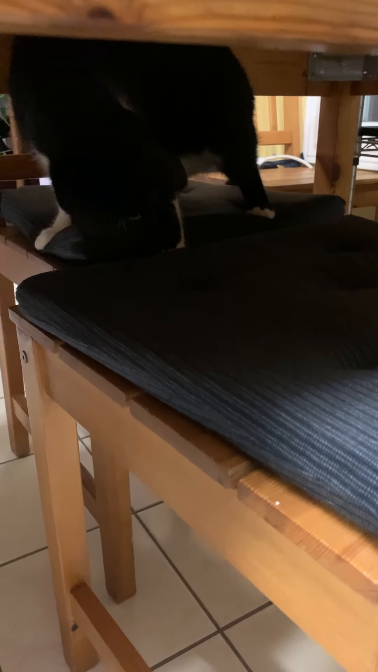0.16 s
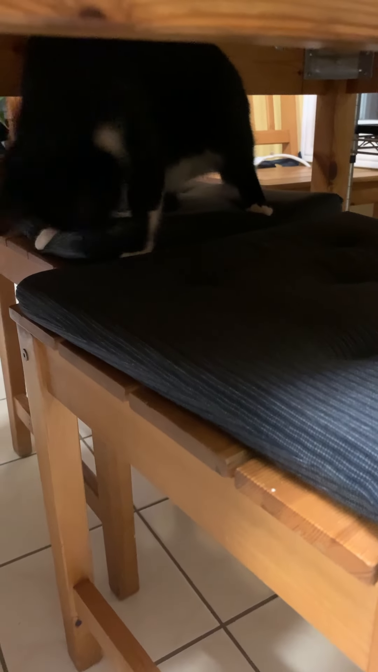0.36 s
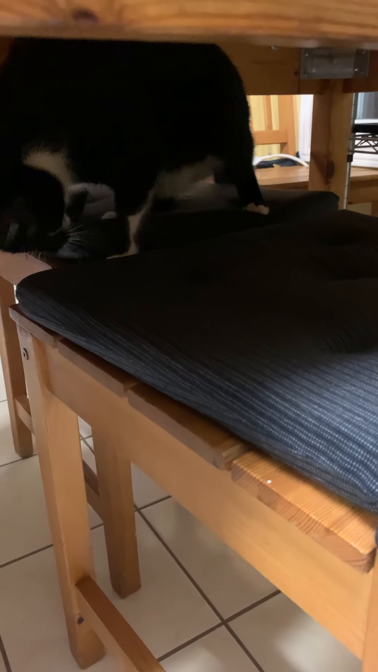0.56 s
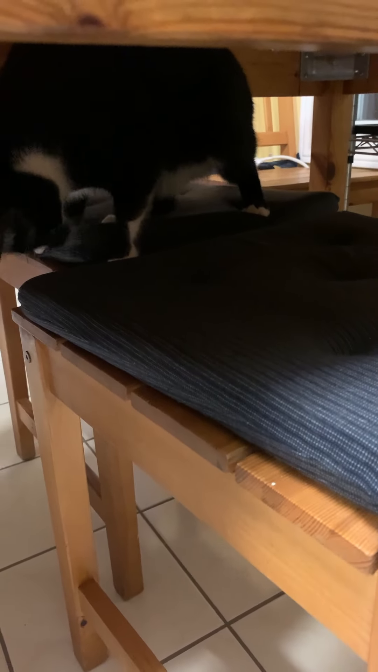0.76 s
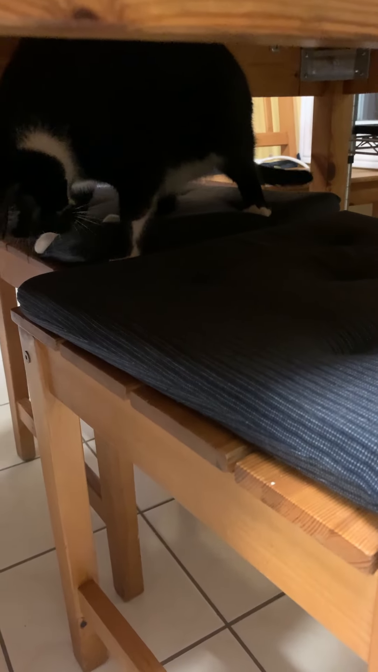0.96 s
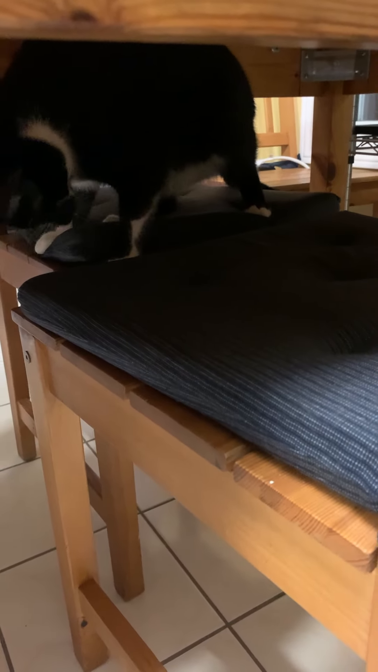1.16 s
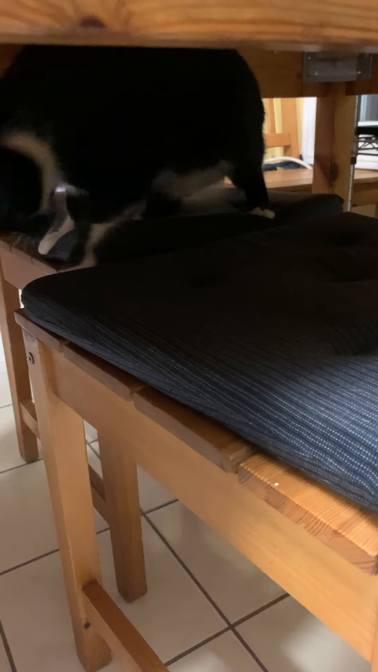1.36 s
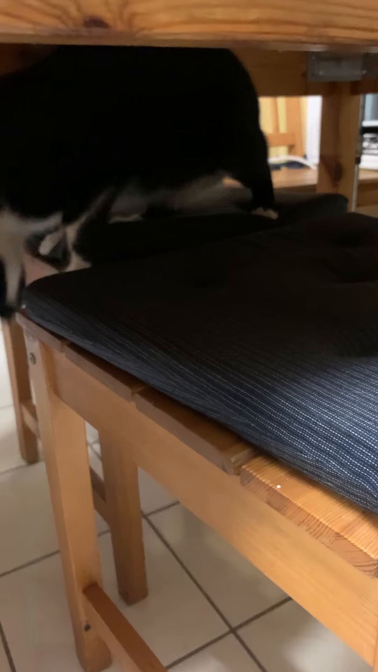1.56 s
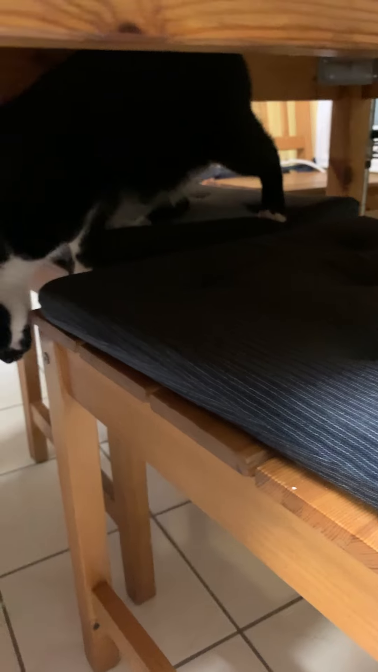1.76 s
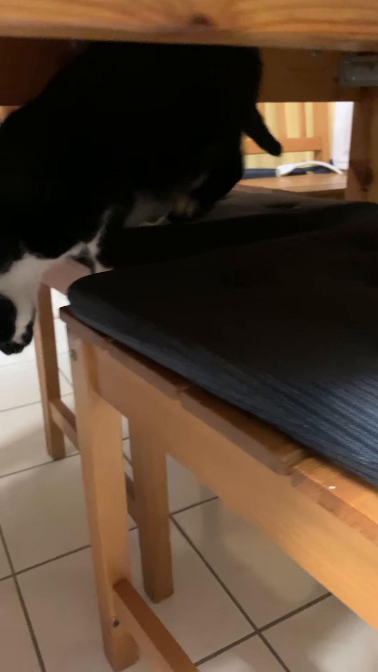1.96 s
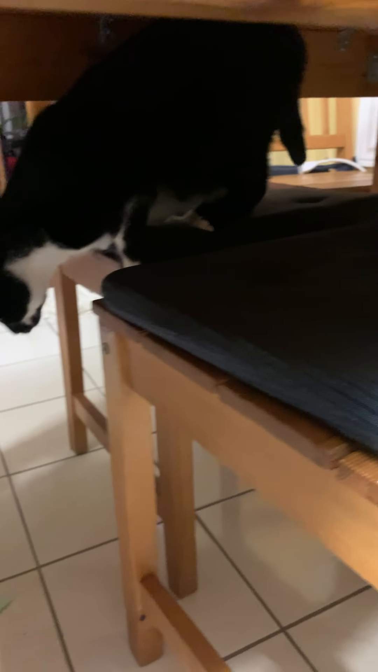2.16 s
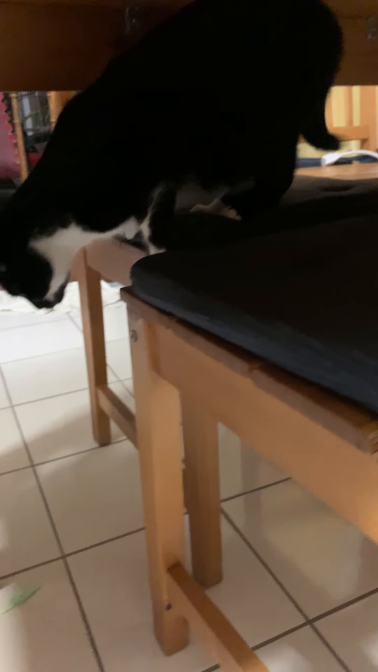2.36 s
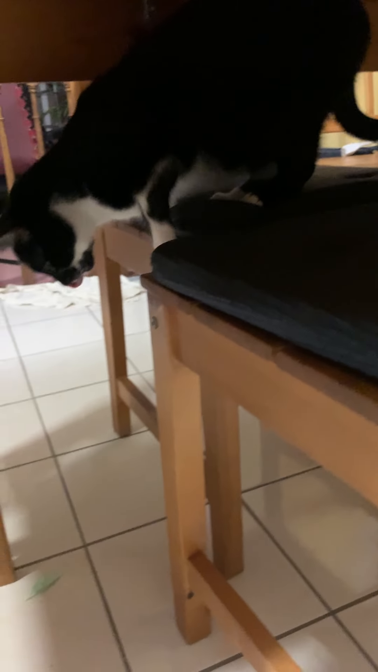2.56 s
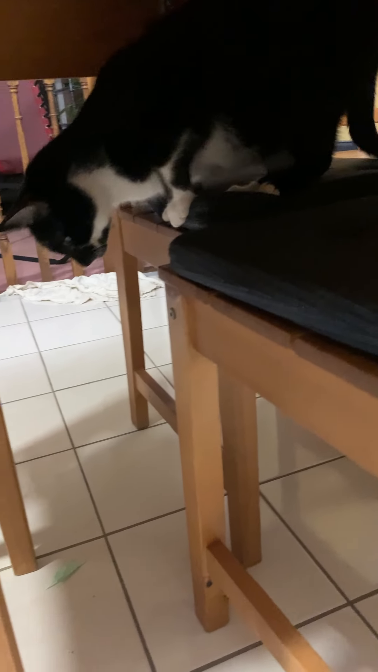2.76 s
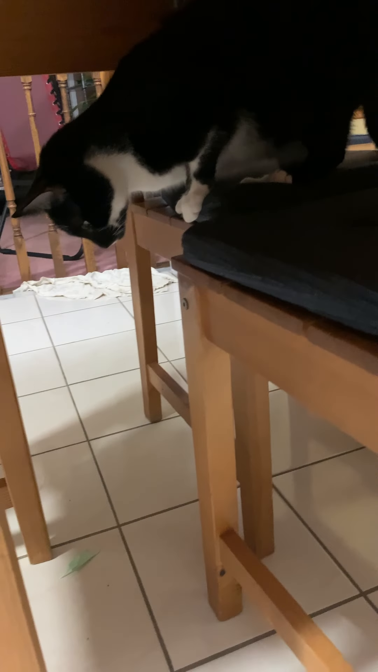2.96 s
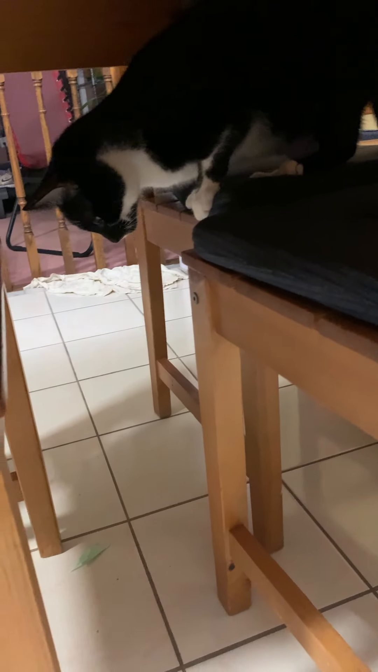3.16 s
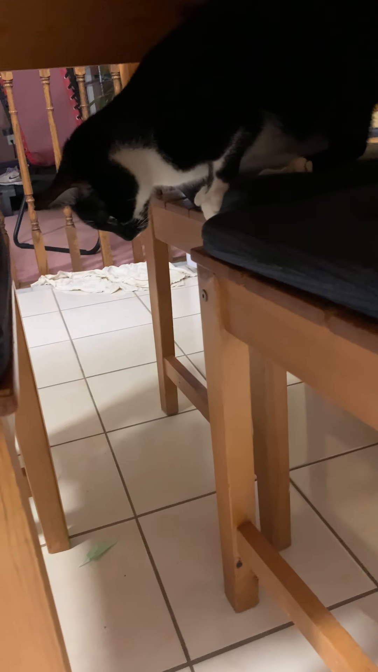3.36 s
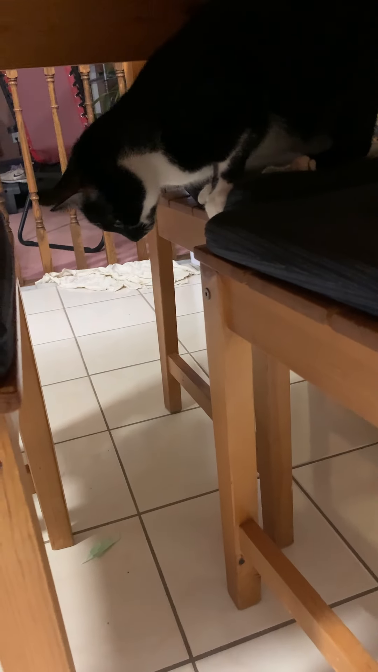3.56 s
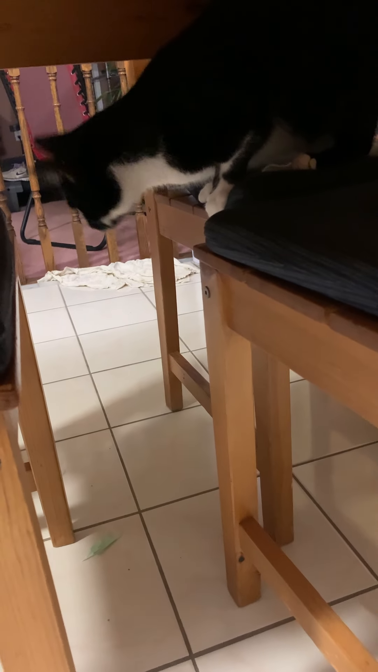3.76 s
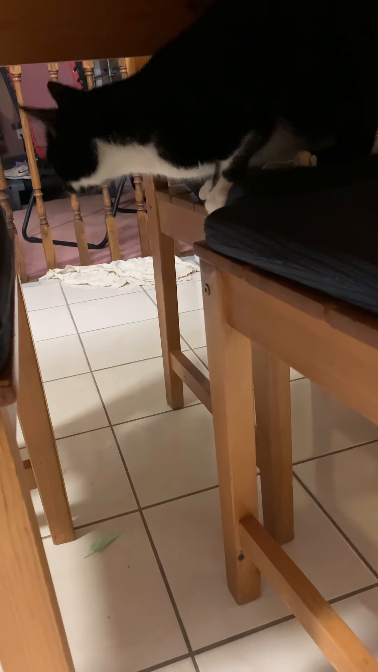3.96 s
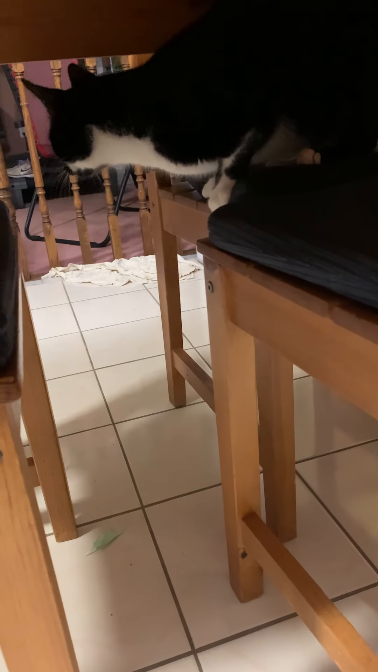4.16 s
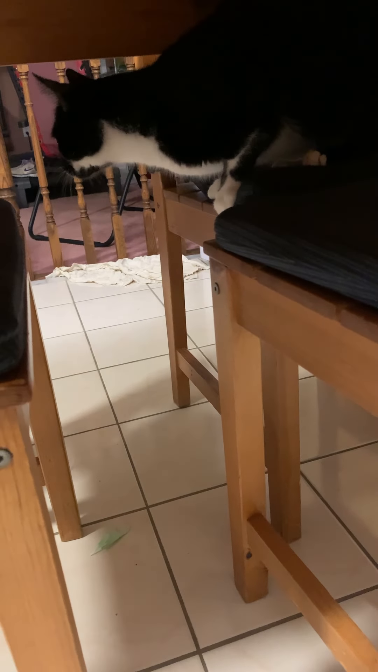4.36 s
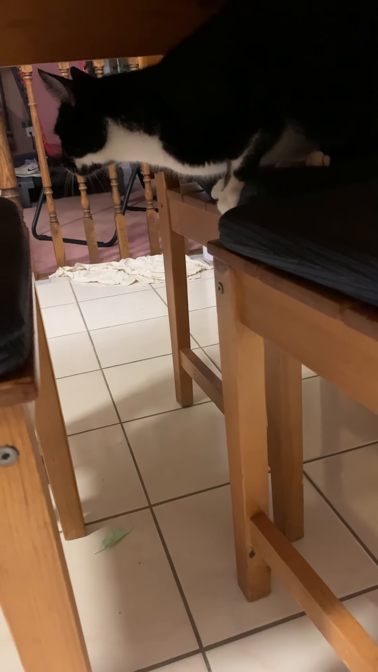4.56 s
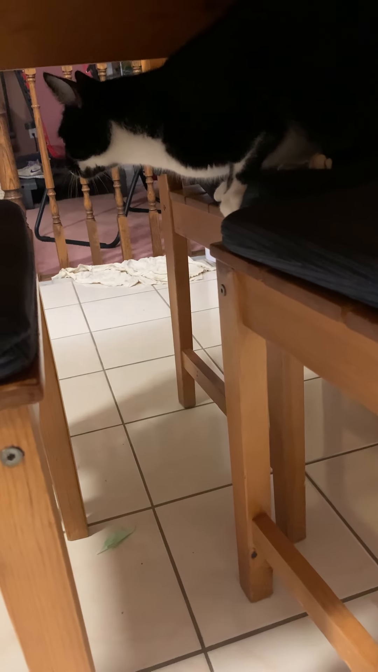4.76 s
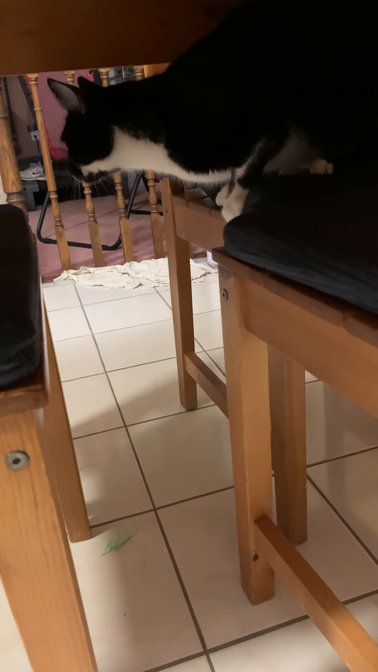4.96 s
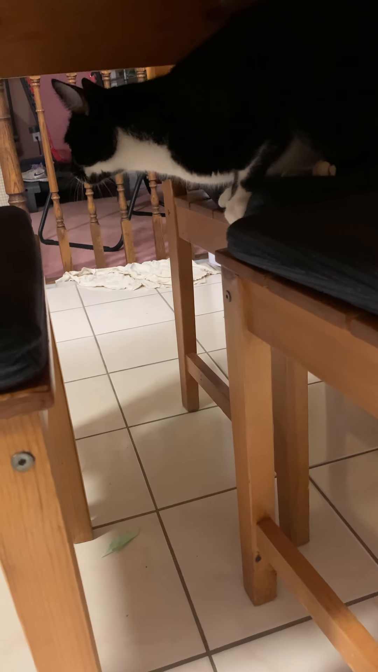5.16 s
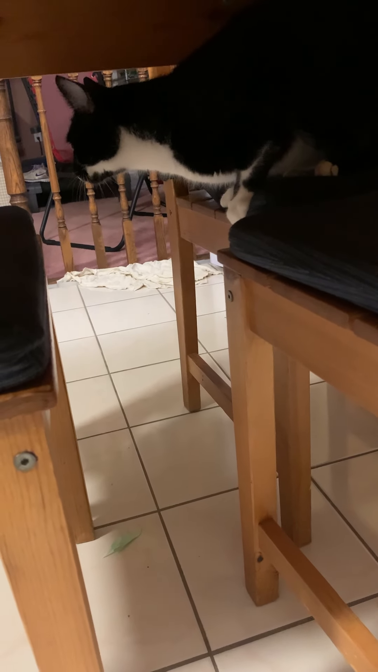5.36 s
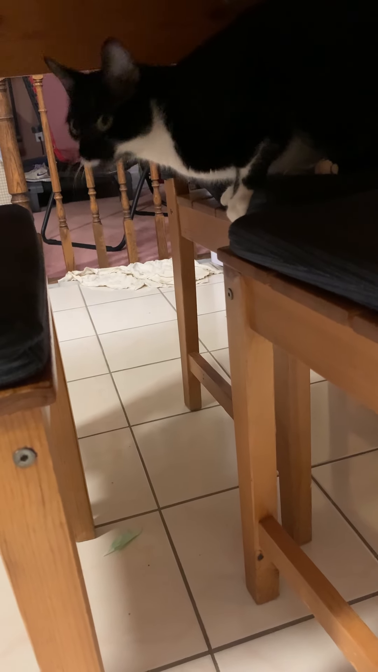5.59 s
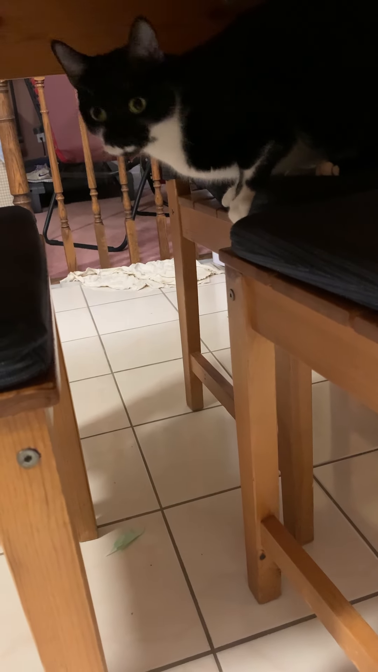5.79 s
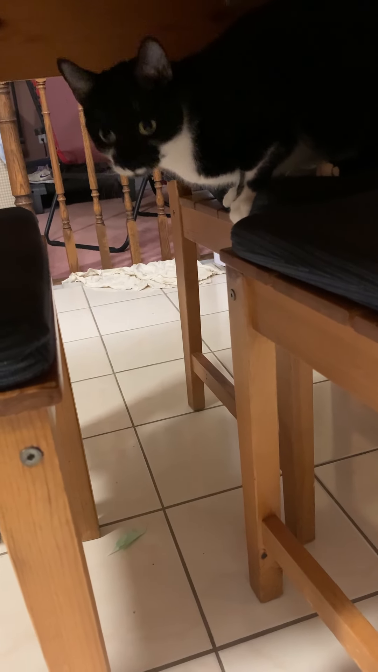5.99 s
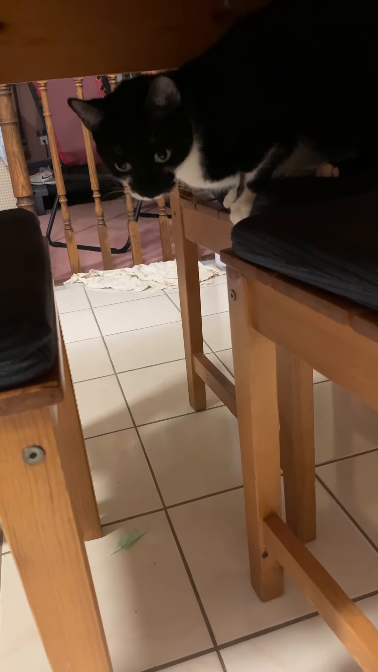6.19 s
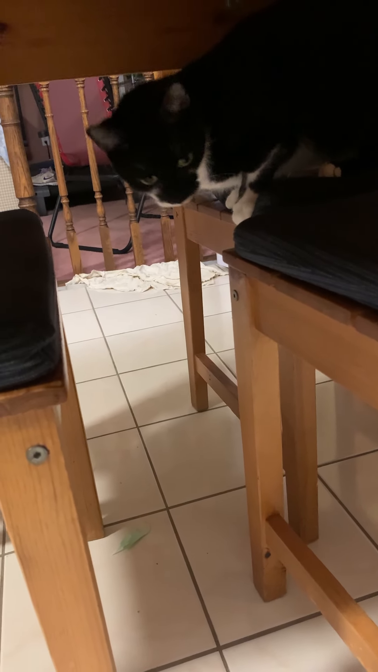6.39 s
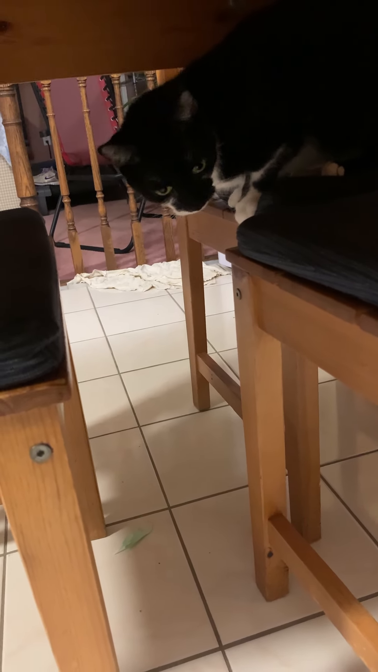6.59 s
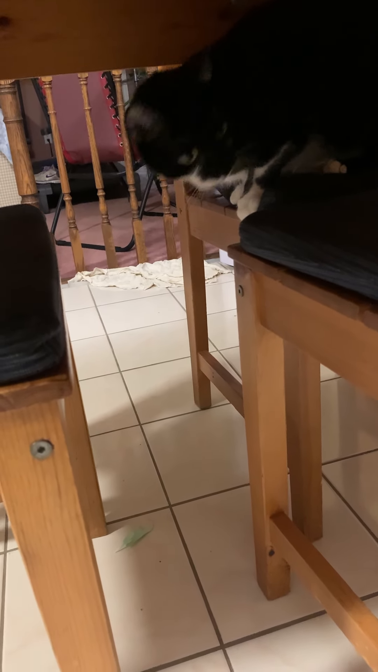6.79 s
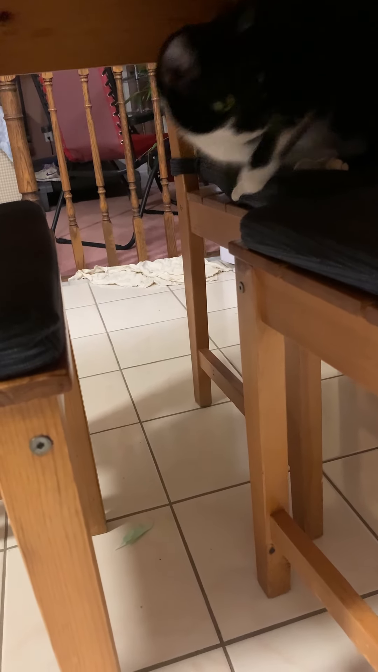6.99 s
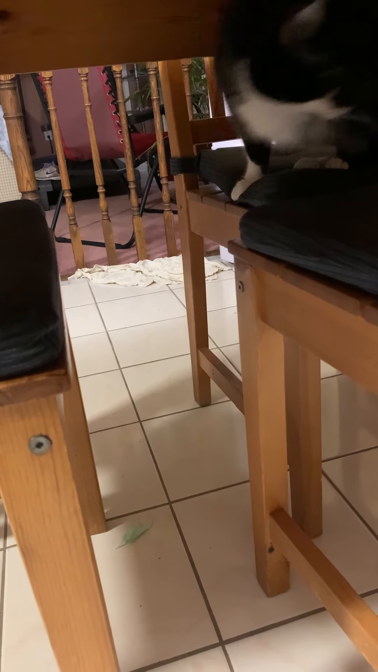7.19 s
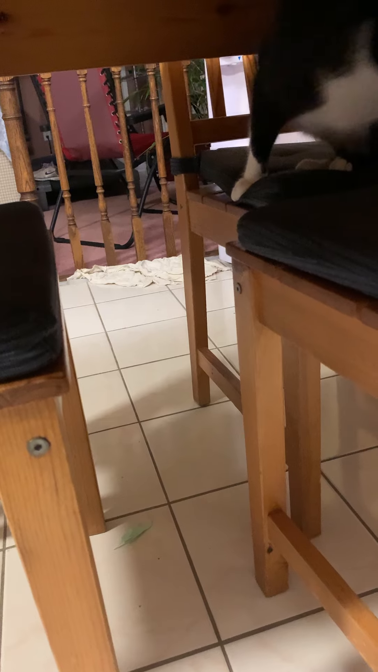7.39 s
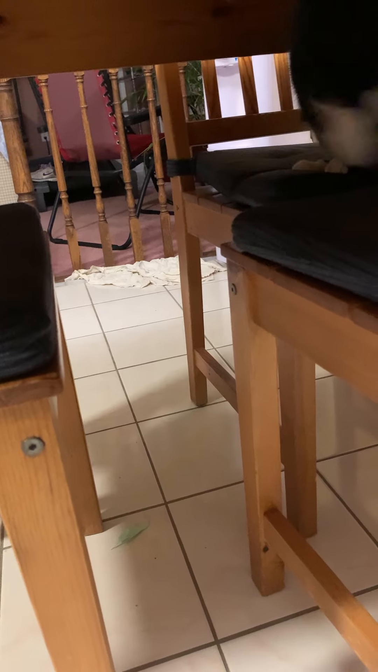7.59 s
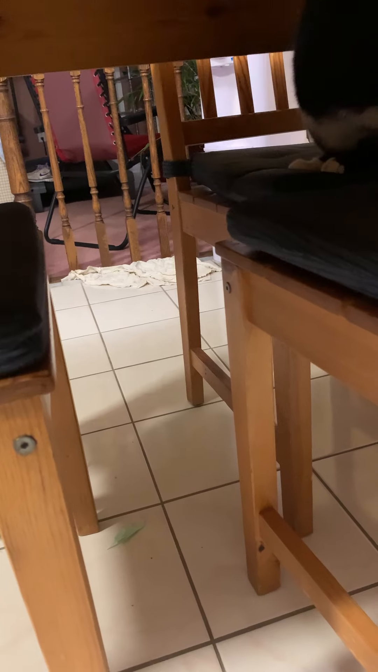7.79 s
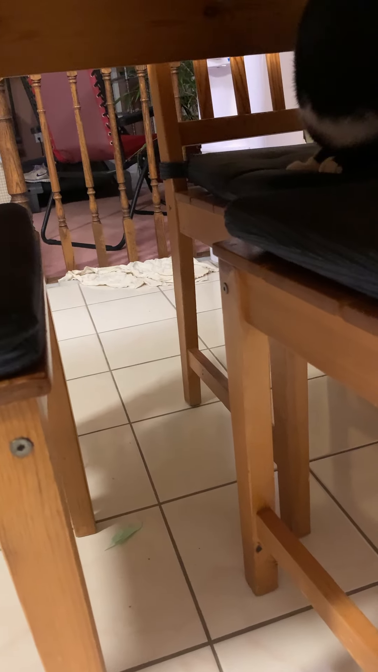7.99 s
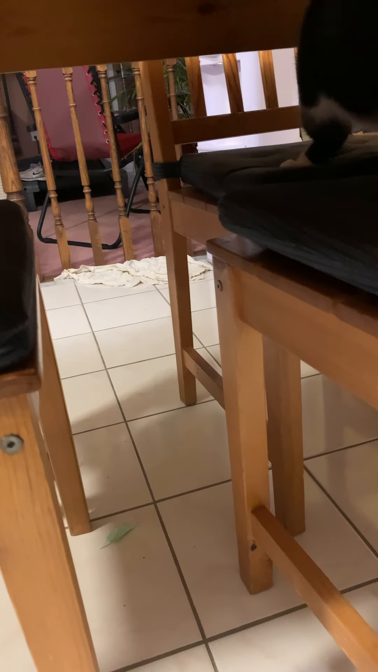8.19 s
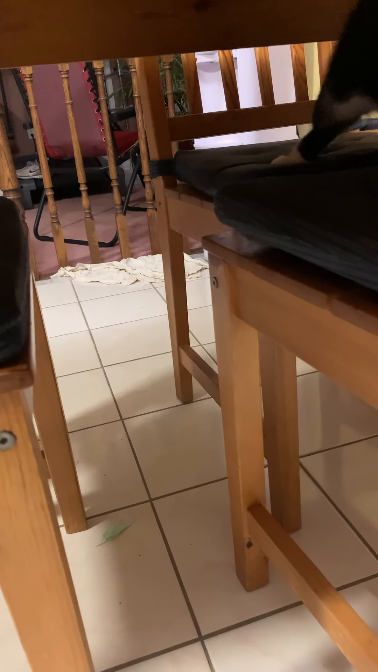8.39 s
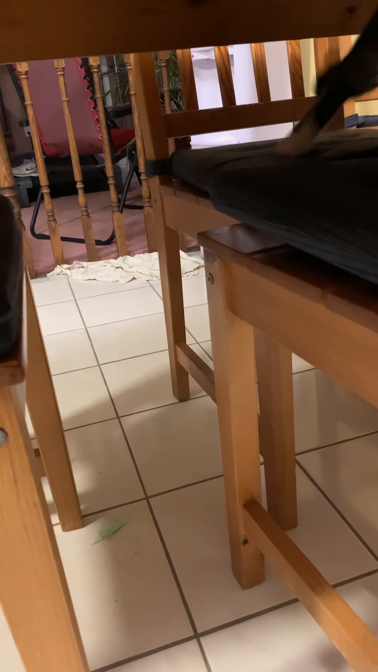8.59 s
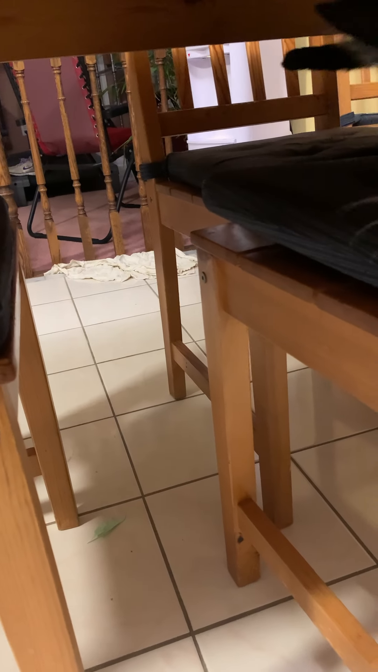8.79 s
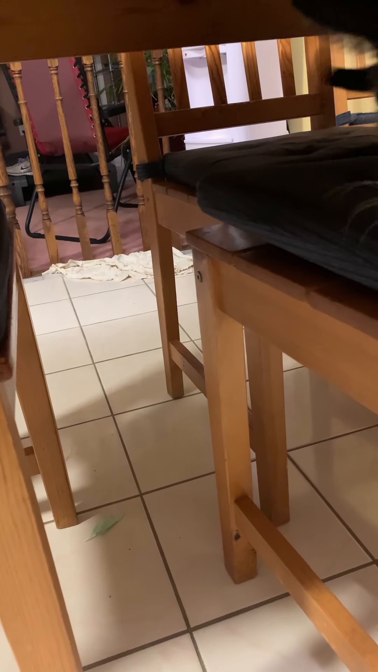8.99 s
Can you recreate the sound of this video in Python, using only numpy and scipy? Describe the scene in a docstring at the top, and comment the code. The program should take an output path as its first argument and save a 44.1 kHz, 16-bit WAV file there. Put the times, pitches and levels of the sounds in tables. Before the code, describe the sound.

A cat shifts on a cushioned wooden chair, making its legs knock irregularly on a tiled floor, with brief claw scratches and faint squeaks. A toothpick drops and bounces in tiny bright ticks. For several seconds there is little but a fridge's low hum, thin whine and soft fan noise, then the chair knocks again. The microphone is near the floor of a slightly reverberant kitchen.

```python
"""The legs of a cushioned wooden chair knock on a tiled floor as a cat shifts its weight on the seat.
Each impact excites the modes of the frame and sends dispersive bending waves through the floor.
The cat paws at a toothpick until it drops and bounces in bright ticks; its claws scratch the cushion.
Behind them a fridge compressor hums and whines at harmonics of its shaft rate, over broad fan noise.
A phone's microphone pair hears the reverberant kitchen from close to the floor."""
import sys
import numpy as np
from scipy import signal
from scipy.fft import rfft, irfft, next_fast_len
from scipy.io import wavfile
from scipy.ndimage import uniform_filter1d

SR = 44100
rng = np.random.default_rng(int(sys.argv[2]) if len(sys.argv) > 2 else 0)


def to_wav(s):
    """Save 16-bit WAV."""
    ch = np.atleast_2d(s).T  # columns
    pcm = np.round(np.clip(ch, -1, 1) * 32767)  # PCM
    wavfile.write(sys.argv[1], SR, pcm.astype(np.int16))


N = 398643


def chair_knocks():
    """Impact and dispersion: a push rebounds twice and rings the frame; bending waves bring treble first."""
    # leg impacts: t/s, level/dB, pitch f/Hz, relative clack, grit and ring levels/dB,
    # lag of the pitch behind the treble/cycles, rebound strength
    impacts = [(0.012, -43, 162, 8.5, -9, 3, 1.37, 2.7), (0.1887, -22, 198, -8.5, -19.5, -0.5, 1.74, 1.6),
               (0.3545, -27.5, 200, -12, -36, -3.5, 1.8, 2.2), (0.885, -40, 190, -31, -34, -2.5, 2.43, .6),
               (0.9865, -22.5, 200, -6, -19, 0, 1.9, 2), (1.224, -35.5, 173, -31, -15, -3, 2.65, 0.48),
               (1.329, -37.5, 199, -23, -17, -1.5, 2.5, 0.53),
               (1.653, -17, 242, -4.5, -15.5, 0, 0.68, 1.56),
               (1.756, -30.5, 277, -40.5, -21, -7, 2.46, 1.3),
               (7.2352, -36.5, 199, -11.5, -34, -2, 1.6, 1.1),
               (7.3914, -21.5, 235, -4, -19.5, -2, 1.74, 1.3),
               (7.497, -40.5, 170, -28, -19.5, -3, 2.4, 0.56), (7.97, -48, 168, 1, -10.5, 1, 2.5, .6),
               (8.066, -26.5, 382, -7.5, -32, 0.5, 2.37, 1.7), (8.084, -29.5, 203, -21, -40, -6, 1.57, 1.3),
               (8.132, -19, 255, -4, -14, 1, 0.67, 1.86), (8.213, -31.5, 252, -7, -42, -4, 2.6, 0.93),
               (8.564, -38, 147, -21, -34, 0.5, 2.43, 0.43), (8.754, -28.5, 290, -12, -37, -4, 2.4, 1.7),
               (8.854, -30, 322, -21, -42, 0.5, 2.57, 0.99), (8.948, -35, 173, -10, -38, 1.5, 2.5, .8),
               (9.002, -43, 184, -26, -31, -8, 2.92, .6)]
    # modes of the frame: f/Hz, bandwidth/Hz, relative level/dB
    frame_modes = [(133, 34, 4.5), (179.5, 60, 5), (218.3, 19, 13.5), (277, 35, 10.5), (373, 13, 5.5),
                   (427, 12, 7.5), (557, 39, 5.5), (710, 15, -8.5), (797, 21, 6), (944, 62, 4.5),
                   (1190, 29, 12.5), (1340, 44, 13), (1537, 35, 11.5), (1674, 58, 7), (2110, 290, -2.5),
                   (2790, 250, -8.5), (3550, 470, -10.5)]
    ring_db, rattle_db, fizz_db = -41, -32, -19
    rattle_hz, detune = 480, 0.024
    boom_hz, boom_width_hz, boom_t60_s = 79.6, 48.5, 0.65  # lowest resonance of the kitchen
    out, t = np.zeros(N), np.arange(SR // 2) / SR
    hz = np.maximum(np.fft.rfftfreq(len(t), 1 / SR), 1)
    since_contact = np.maximum(t - .01, 0)
    end_fade = np.minimum(1, 10 * (t[-1] - t))
    early, later = (np.exp(-2j * np.pi * hz * lag_s) for lag_s in (.007, .0108))

    def bell(centre_hz, octaves):
        """Gaussian spectrum in log frequency, whose pulse peaks near 1."""
        shape = np.exp(-(np.log2(hz / centre_hz) / octaves) ** 2)
        return shape / shape.mean()

    for s, level_db, pitch_hz, clack_db, grit_db, frame_db, lag_cycles, rebound in impacts:
        shift = 1 + detune * rng.standard_normal(len(frame_modes))  # the modes move with the load
        frame = sum((-1) ** k * undb(db) / (1 + 2j * (hz - f * shift[k]) / width)
                    for k, (f, width, db) in enumerate(frame_modes))
        rattle_noise, boom_noise, grit_noise = rng.standard_normal((3, len(t)))
        push = bell(pitch_hz, 0.85) + undb(clack_db) * bell(688, 0.61)
        # the early rebound fades on the way through the floor
        rebounds = rebound * (0.29 * np.clip(1.7 - lag_cycles, 0, 1) * early + 0.3 * later)
        ring = undb(frame_db + ring_db) * frame
        rattle = undb(frame_db + rattle_db) * rfft(rattle_noise * burst(t, 0.00097, 0.024)) * frame
        rattle *= np.sqrt(hz / 300) * bell(np.sqrt(rattle_hz * pitch_hz), 1.004)
        # the main pitch lands 7.5 ms after contact, higher frequencies up to spread_s earlier
        spread_s = lag_cycles / pitch_hz
        phase_cycles = 2 * spread_s * np.sqrt(pitch_hz * hz) + (.0075 - spread_s) * hz - lag_cycles
        spectrum = ((1 + rebounds + ring) * push + rattle) * np.exp(-2j * np.pi * phase_cycles)
        blow = np.roll(irfft(spectrum), int(0.0099 * SR))
        # grit scraped under the leg
        grit_colour = undb(grit_db) * (bell(2200, .95) * frame + undb(fizz_db) * bell(5500, .7))
        grit = 0.19 * irfft(rfft(grit_noise) * grit_colour) * burst(since_contact, 0.00067, 0.019)
        # duller, softer knocks carry a larger share of boom
        boom_db = -17 - 3 * np.log2(pitch_hz / 200) - 0.4 * (level_db + 28)
        boom = undb(boom_db) * unit_rms(steep_band(boom_noise, boom_hz, boom_width_hz))
        boom *= burst(since_contact, 0.035, boom_t60_s / np.log(1000))
        add(out, s - .01, undb(level_db) * (blow + grit + boom) * end_fade)
    return out


def toothpick():
    """Brief contact gives a broad spectrum: a light stick ticks on hard tile, chatters and rolls."""
    # bounces: t/s, level/dB, brightest f/Hz
    bounces = [(1.5734, -31.5, 9900), (1.6006, -17, 15300), (1.6035, -30, 11900), (1.6075, -29, 14270),
               (1.7359, -31.5, 5300), (1.7945, -42, 11600), (1.819, -38, 14700), (1.838, -48, 6340),
               (1.845, -29, 8300), (1.854, -51, 7320), (1.8813, -40.5, 6960), (1.891, -47, 6470),
               (1.916, -39.5, 8040), (1.968, -43.5, 14600)]
    tick_s, chatter_db, low_db = .0003, -18, -24.5
    out, t = np.zeros(N), np.arange(1500) / SR
    tick = np.e * t / tick_s * np.exp(-t / tick_s)
    chatter = undb(chatter_db) * burst(t, 0.00087, .004)
    for s, level_db, bright_hz in bounces:
        contact = rng.standard_normal((2, len(t))) * (tick + chatter)
        top = steep_band(contact[0], bright_hz, 8900) + 0.89 * steep_band(contact[0], 6270, 1900)
        low = band(contact[1], 1500, 900) + .7 * band(contact[1], 3400, 1500)
        add(out, s, undb(level_db) * (top / np.abs(top).max() + undb(low_db) * low / np.abs(low).max()))
    grains = friction_noise(2, roughness_db=3)
    roll = unit_rms(steep_band(grains[0], 8100, 6000) + 0.74 * band(grains[1], 2600, 3000))
    return out + roll * strokes(start_s=[1.81], length_s=[0.082], level_db=[-62.5])


def seat_friction(crest_db=8, scratch_attack_s=0.003):
    """Friction drives the resonances of the seat: rubbing paws, short scratchy bursts and squeaks."""
    # paws dragged over the cushion: t/s, duration/s, level/dB, relative treble and board levels/dB
    rubs = [(0.0, 0.022, -50.5, -23, 7), (0.033, 0.057, -71, -27, 0), (0.115, 0.05, -65, -25, 8),
            (0.16, 0.14, -61.5, -35, 5.5), (0.296, 0.091, -64, -35, 0), (0.415, .07, -77, -30, 11),
            (0.832, 0.11, -76, -22, -1), (1.313, 0.035, -68, -20, 4), (1.364, 0.017, -67.5, -30, 13.5),
            (2.48, .04, -76, -25, 2), (3.316, .04, -83, -25, 0), (8.29, 0.072, -75.5, -11, -4),
            (8.587, 0.087, -78, -9, -4)]
    # short scratchy bursts (claws on cloth, and the gritty fizz of two chair knocks):
    # t/s, level/dB, relative treble level/dB, T60/s, relative board level/dB
    scratches = [(0.0094, -46, -27, 0.041, -3), (0.163, -32, -38, 0.051, -1), (0.3015, -44, -39, 0.048, 0),
                 (0.357, -56, -27, 0.051, -5), (0.861, -49.5, -17, 0.073, -8), (1.241, -37, -38, 0.055, -7),
                 (1.257, -34.5, -38, 0.044, -9), (1.27, -42, -40, 0.06, -5),
                 (1.2928, -24.5, -12.5, 0.032, -1), (1.304, -38, -27, 0.026, 9),
                 (7.395, -44.5, -29, 0.15, 7), (8.612, -53, -30, 0.068, 12)]
    # squeaks of the seat: t/s, duration/s, level/dB
    squeaks = [(0.0, 0.015, -55.5), (0.112, 0.023, -61.5), (0.2, 0.021, -73), (0.298, 0.028, -61),
               (0.378, 0.063, -71), (.8, 0.24, -71), (1.238, 0.014, -59), (1.263, 0.0074, -56),
               (1.267, 0.02, -56)]
    # resonances of the board (first two rows) and cushion: f/Hz, bandwidth/Hz, relative level/dB
    seat_modes = [(907, 220, 24), (1414, 120, 21), (2270, 1030, 17.5), (3440, 690, 16.5),
                  (5000, 1760, 18.5), (6060, 530, 13.5), (7320, 190, 10)]
    start_s, length_s, rub_db, treble_db, board_db = np.transpose(rubs)
    cloth_gain = strokes(start_s, length_s, rub_db)
    board_gain = strokes(start_s, length_s, rub_db + board_db)
    treble_gain = strokes(start_s, length_s, rub_db + treble_db)
    t = np.arange(SR // 4) / SR
    for s, level_db, treble_db, t60_s, board_db in scratches:
        envelope = undb(level_db - crest_db) * burst(t, scratch_attack_s, t60_s / np.log(1000))
        add(cloth_gain, s, envelope)
        add(board_gain, s, undb(board_db) * envelope)
        add(treble_gain, s, undb(treble_db) * envelope)
    grains = friction_noise(3, roughness_db=2.5)
    modes = [undb(db) * steep_band(grains[0], hz, width) for hz, width, db in seat_modes]
    board, cloth = sum(modes[:2]), sum(modes[2:])
    scratch = (board_gain * board + cloth_gain * cloth) / np.std(board + cloth)
    squeak = unit_rms(steep_band(grains[1], 1680, 200) + 0.12 * steep_band(grains[1], 6250, 1000))
    treble = unit_rms(steep_band(grains[2], 10300, 5000))
    return scratch + strokes(*np.transpose(squeaks)) * squeak + treble_gain * treble


def fridge(shaft_hz=58.634, loudest_whine_harmonic=69):
    """Rotation radiates harmonics of the shaft rate: a wavering hum and clusters of fluttering whine."""
    # compressor tones: harmonic number, level/dB (for the whine, relative within its cluster)
    harmonics = [(1, -75), (2, -67), (3, -55), (4, -65), (10, -76), (11, -63), (38, -89), (39, -82),
                 (40, -87), (41, -81), (44, -90), (46, -85), (65, -90), (66, -82), (67, -88), (68, -85),
                 (69, -77), (70, -85), (71, -81), (74, -89), (75, -88), (79, -89), (80, -81), (82, -77),
                 (105, -81), (106, -84), (107, -85), (108, -91), (126, -99)]
    # whine as the phone moves among standing waves:
    # t/s, level/dB near 2.4 kHz, near 4 kHz, of the loudest whine tone, near 6 kHz
    whine_levels = [(0.0, -72, -76, -83, -82), (0.7, -77, -76.5, -76.5, -78.5),
                    (1.6, -76.5, -77.5, -81, -83.5), (2.06, -81, -80, -67.5, -78.5),
                    (2.4, -79.5, -87, -70, -81), (2.7, -78, -77, -74.5, -79),
                    (3.05, -79, -84, -73.5, -80.5), (3.7, -76, -78, -80.5, -79),
                    (4.3, -74.5, -78, -75, -79), (4.8, -76.5, -80, -76.5, -75), (5.3, -78, -78, -80.5, -75),
                    (6.25, -76, -75, -73, -69.5), (6.75, -80, -91, -76.5, -82), (7.1, -78, -83, -79, -83.5),
                    (7.55, -77, -81, -72, -76), (8.4, -77, -80, -72, -89), (9.04, -74, -75, -68, -81.5)]
    shaft_angle = 2 * np.pi * np.cumsum(shaft_hz + 0.014 * wander(0.89)) / SR
    hum_waver = [undb(1.5 * wander(4)) for _ in range(7)]
    whine_waver = [undb(2.5 * wander(4)) for _ in range(7)]
    whine_flutter = [slow * undb(3 * wander(40)) for slow in whine_waver]
    faint_tones = {k: -96 + 3 * rng.standard_normal() for k in range(54, 110)}
    clusters = np.zeros((6, N))  # the hum, four bands of whine, the loudest whine tone
    for j, (k, db) in enumerate((faint_tones | dict(harmonics)).items()):
        cluster = 5 if k == loudest_whine_harmonic else np.searchsorted([30, 50, 76, 100], k)
        waver = (whine_flutter if cluster else hum_waver)[j % 7]
        tone = np.sqrt(2) * np.sin(k * shaft_angle + 2 * np.pi * rng.random())
        clusters[cluster] += undb(db) * waver * tone
    hum, *whines = clusters
    s, *curves_db = np.transpose(whine_levels)
    low, mid, loudest, high = (undb(np.interp(np.arange(N) / SR, s, db)) for db in curves_db)
    gains = (low, mid, undb(-71), high, loudest)  # the band near 5 kHz has a constant gain
    return hum + sum(gain * unit_rms(whine) for gain, whine in zip(gains, whines))


def air(flicker_db=1.5):
    """Broadband noise of fan and kitchen air, slowly modulated in level; four bands flicker on their own."""
    # noise spectrum: f/Hz, spectral density level/dB
    spectrum = [(30, -102), (50, -91.5), (75, -81), (130, -91), (230, -84), (400, -91), (700, -100),
                (1200, -104.5), (1600, -108), (1950, -115), (2400, -112), (3000, -121), (3700, -117),
                (4500, -114), (6500, -124), (9000, -126), (15500, -131)]
    colour = undb(on_log(np.fft.rfftfreq(N, 1 / SR), spectrum)) * np.sqrt(SR / 2)
    noise = diffuse_pair(*irfft(rfft(rng.standard_normal((2, N))) * colour, N))
    flicker = sum((undb(flicker_db * wander(9)) - 1) * band(noise, hz, hz / 1.6)
                  for hz in (350, 900, 1500, 3200))
    return (noise + flicker) * undb(wander(0.64))


def room(dry, wet_db, onset_s=0.00049):
    """Reverberation: dense reflections build up and decay exponentially, each band at its own rate."""
    # reverberation time of the kitchen: f/Hz, T60/s
    decay_times = [(100, 0.65), (200, 0.36), (400, 0.48), (1100, 0.42), (3000, 0.27), (8000, 0.059),
                   (16000, 0.4)]
    t, tails = np.arange(SR) / SR, 0
    onset = 1 - np.exp(-(t / onset_s) ** 2)
    for hz in 70 * 2 ** np.arange(0, 8, .5):
        decay = np.exp(-np.log(1000) * t / on_log(hz, decay_times))
        tails = tails + band(rng.standard_normal((2, SR)), hz, hz / 0.59) * onset * decay
    wet = undb(wet_db) * signal.fftconvolve(dry[None], tails, axes=1)[:, :N]
    return dry + diffuse_pair(*wet)


def diffuse_pair(shared, unrelated):
    """Partial coherence: left and right hear a shared sound plus and minus an unrelated one."""
    # how unlike the two microphones hear the room: f/Hz, relative level/dB of the unrelated part
    incoherence = [(100, -61), (250, -6), (500, -4.5), (800, -7.5), (1300, -7), (2000, 7.5), (2800, -0.5),
                   (4000, 2.5), (16000, -114)]
    side = irfft(rfft(unrelated) * undb(on_log(np.fft.rfftfreq(N, 1 / SR), incoherence)), N)
    return np.array([shared + side, shared - side])


def friction_noise(count, roughness_db):
    """Rough contact: rows of noise with random spikes in amplitude."""
    return rng.standard_normal((count, N)) * undb(roughness_db * rng.exponential(size=N))


def strokes(start_s, length_s, level_db, attack_s=0.0019, release_s=0.0068):
    """Sum of envelopes that rise, hold for their length and decay exponentially."""
    out = np.zeros(N)
    for s, hold_s, gain in zip(start_s, length_s, undb(level_db)):
        t = np.arange(int((hold_s + .4) * SR)) / SR
        add(out, s, gain * np.minimum(t / attack_s, 1) * np.exp(-np.maximum(t - hold_s, 0) / release_s))
    return out


def burst(t, attack_s, decay_s):
    """Envelope with exponential rise and decay."""
    return (1 - np.exp(-t / attack_s)) * np.exp(-t / decay_s)


def wander(rate_hz):
    """Slow modulation: random values held for 1 / rate_hz seconds and smoothed twice."""
    hold = int(SR / rate_hz)
    steps = np.repeat(rng.standard_normal(N // hold + 1), hold)
    return uniform_filter1d(uniform_filter1d(steps, hold), hold)[:N]


def band(x, hz, width_hz):
    """Two-pole resonance, gain 1 at the centre."""
    return signal.lfilter(*signal.iirpeak(hz, hz / width_hz, fs=SR), x)


def steep_band(x, hz, width_hz):
    """Two equal resonances in cascade."""
    return band(band(x, hz, width_hz), hz, width_hz)


def on_log(hz, table):
    """Interpolation over log frequency."""
    table_hz, values = np.transpose(table)
    return np.interp(np.log(np.maximum(hz, 1)), np.log(table_hz), values)


def undb(db):
    return 10 ** (np.asarray(db) / 20)


def unit_rms(x):
    return x / np.sqrt(np.mean(x ** 2))


def add(out, start_s, sound):
    i = int(start_s * SR)
    out[i:i + len(sound)] += sound[:N - i]


def scene():
    """Superposition: knocks, toothpick and seat friction reverberate over the fridge and the air."""
    background = fridge() + air()
    return room(chair_knocks(), -44.5) + room(toothpick(), -42) + room(seat_friction(), -43) + background


def record(dry, cutoff_hz=16500):
    """Phase and level differences between the two microphones form the stereo image; the top is cut."""
    # microphone pair: f/Hz, phase lead of the left/rad, left minus right level/dB
    pair_response = [(0, 0, 2), (170, -.3, 2.8), (350, -.65, 4), (600, -1.3, -2), (1000, -2, 0),
                     (1500, .2, 0), (2000, .7, 0), (3500, 1.3, 0), (4750, 3.14, 0), (9000, 9.42, 0),
                     (13300, 15.7, 0), (17650, 22, 0)]
    size = next_fast_len(N + 4096)
    hz = np.fft.rfftfreq(size, 1 / SR)
    table_hz, lead_rad, left_db = np.transpose(pair_response)
    left = np.exp(.5j * np.interp(hz, table_hz, lead_rad)) * undb(np.interp(hz, table_hz, left_db) / 2)
    stereo = irfft(rfft(dry, size) * np.array([left, 1 / left]), size)[:, :N]
    return signal.sosfilt(signal.ellip(8, .2, 70, cutoff_hz, fs=SR, output="sos"), stereo)


dry = scene()
out = record(dry)
to_wav(out)
```